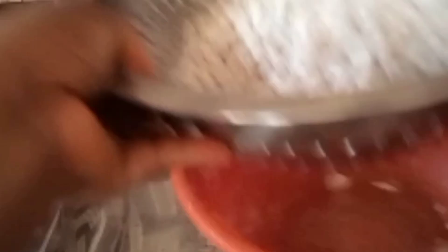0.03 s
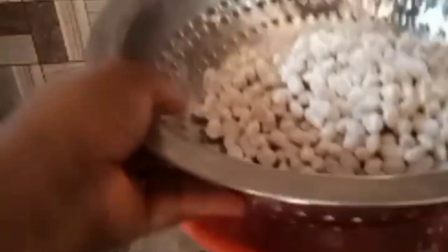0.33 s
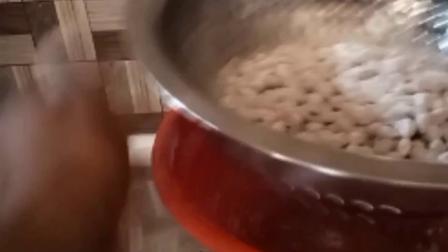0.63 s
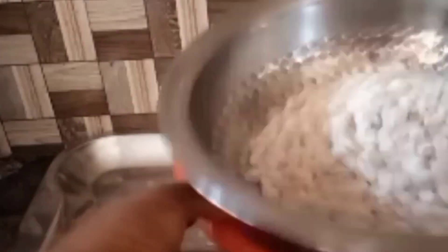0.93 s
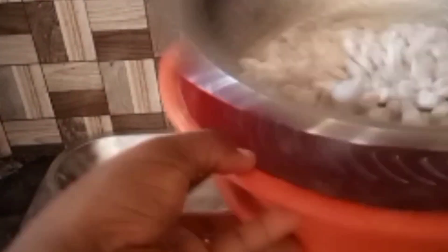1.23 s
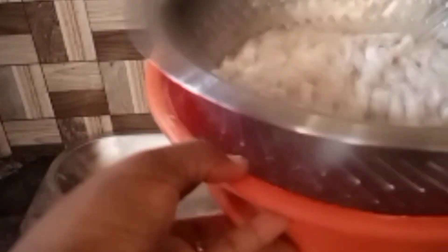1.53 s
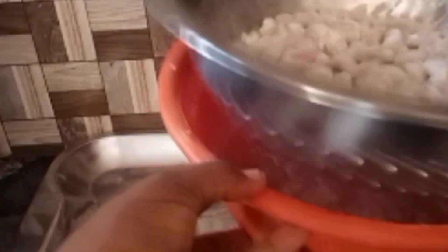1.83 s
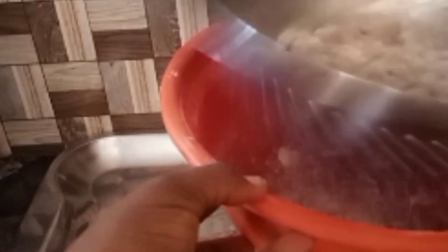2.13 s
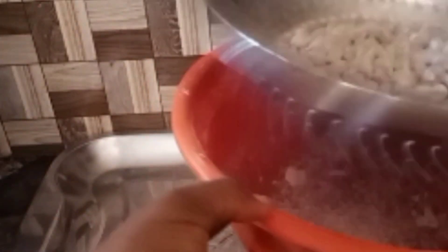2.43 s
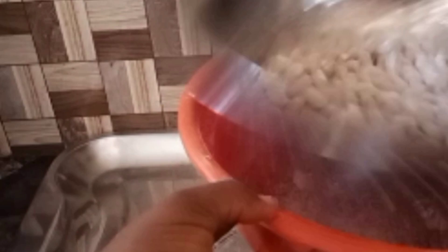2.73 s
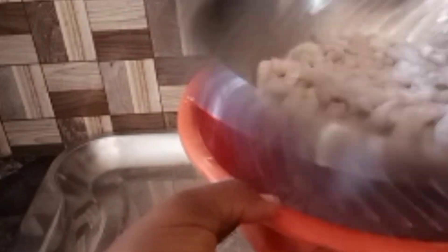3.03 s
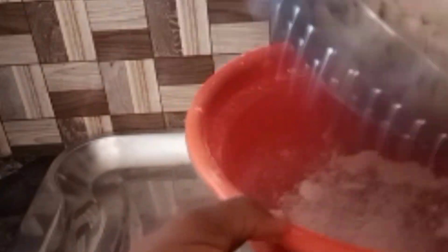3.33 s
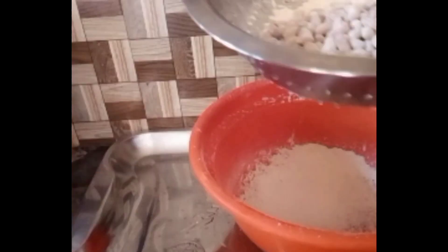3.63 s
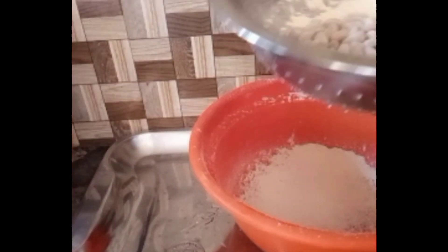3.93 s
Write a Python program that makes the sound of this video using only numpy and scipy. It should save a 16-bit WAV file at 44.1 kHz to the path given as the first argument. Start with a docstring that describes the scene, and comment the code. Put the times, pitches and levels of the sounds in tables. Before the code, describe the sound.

Close up in a kitchen, coated peanuts land in bursts that ring a metal colander. Quieter, fast shaking follows, with nuts sliding and the colander scuffing a plastic bowl. An abrupt, loud rush of nuts ends it and fades.

```python
"""Flour-coated peanuts rattling in a steel colander, close by in a small kitchen. After a dull bump they
are tossed and land in showers of tiny collisions that ring the steel. Then the colander is shaken quickly
over a plastic bowl: the nuts hiss across its holes and clatter on its wall, and it scuffs the bowl.
A last, much louder rush of nuts breaks in abruptly and dies away."""
import sys
import numpy as np
from scipy import signal
from scipy.fft import rfft, irfft, next_fast_len
from scipy.io import wavfile
from scipy.ndimage import uniform_filter1d

SR = 44100
rng = np.random.default_rng(int(sys.argv[2]) if len(sys.argv) > 2 else 0)


def generate_wav(signal):
    """Clip the signal to [-1, 1] and save it as 16-bit WAV at the path in sys.argv[1]."""
    frames = np.transpose(np.atleast_2d(signal))
    scaled = np.clip(frames, -1, 1) * 32767
    pcm = np.round(scaled).astype(np.int16)
    wavfile.write(sys.argv[1], SR, pcm)


N = 176400

# Landing nuts. Each row: start, rise, hold, fall in seconds, then rattle, thud, skitter in relative dB.
SHOWERS = [(0.029, 0.012, 0.058, 0.064, -35.5, -39.5, -50.5),
           (0.375, 0.014, 0.074, 0.042, -30, -64.5, -51.5),
           (0.436, 0.0093, 0.057, 0.038, -31.5, -49.5, -47), (0.646, 0.028, 0.054, 0.038, -37.5, -58, -50),
           (0.709, 0.013, 0.073, 0.032, -30.5, -84, -43), (0.908, 0.022, 0.046, 0.045, -29, -81, -47.5),
           (1.076, 0.01, 0.016, 0.058, -35, -40.5, -38), (1.109, 0.021, 0.1, 0.04, -30, -49, -50),
           (1.276, 0.021, 0.053, 0.16, -28.5, -43, -44), (1.583, 0.018, 0.039, 0.059, -35, -86, -44),
           (1.631, 0.012, 0.028, 0.085, -35, -73, -36)]
# Hard knocks, soft bumps. Each row: start in seconds, relative level in dB, pitch in Hz, T60 in seconds.
CLACKS = [(.38, -33.5, 1990, .14), (.452, -29, 770, 0.031), (.471, -12.5, 1810, 0.04),
          (.49, -29, 2000, .22), (.7194, -20, 5460, 0.031), (.743, -7, 2050, .012),
          (.755, -27.5, 2005, 0.17), (.781, -17, 1790, 0.011), (.79, -33.5, 685.8, 0.23),
          (.912, -24.5, 1940, .067), (.928, -18.5, 1870, 0.027), (1.146, -11, 2100, 0.0099),
          (1.304, -15.5, 756, 0.059), (1.642, -16.5, 5000, 0.026), (1.655, -13, 6300, 0.024)]
BUMPS = [(.024, -6, 311.6, 0.059), (.088, -28, 320, .16), (3.237, -37.5, 190, 0.026),
         (3.345, -48.5, 195, 0.051), (3.544, -16.5, 316, 0.06), (3.926, -43.5, 134, 0.26)]
# Sieving strokes. Each row: peak time, rise, fall in seconds, relative level in dB.
STROKES = [(0, .05, 0.35, -44.5), (1.449, 0.061, 0.064, -44), (1.55, 0.036, 0.1, -49.5),
           (1.764, 0.086, 0.044, -47.5), (1.872, 0.066, 0.12, -38.5), (1.973, 0.055, .13, -47),
           (2.06, 0.034, 0.4, -48), (2.19, .037, .19, -45.5), (2.321, 0.056, .21, -44.5),
           (2.429, 0.059, 0.23, -47.5), (2.545, 0.082, 0.099, -47.5), (2.648, .081, 0.2, -44),
           (2.751, 0.04, 0.084, -40.5), (2.84, 0.066, 0.13, -45.5), (2.938, 0.052, 0.055, -40),
           (3.039, 0.077, 0.12, -39), (3.145, 0.082, 0.12, -40.5), (3.245, 0.082, 0.12, -46.5),
           (3.347, .013, 0.11, -47)]
# Nuts sliding between strokes. Each row: time in seconds, relative level in dB.
SLIDE_LEVELS = [(1.3, -72), (1.4, -52.5), (2, -51.5), (2.5, -57.5), (3.15, -67), (3.3, -65), (3.44, -74)]
# Clumps on the wall, scuffs on the bowl. Each row: time, hold in seconds, relative dB, pitch in Hz.
TUMBLES = [(1.852, 0.035, -44.5, 1370), (2.043, 0.0072, -45.5, 3460), (2.063, 0.026, -42, 1394),
           (2.169, .015, -45.5, 1444), (2.176, 0.027, -47, 2994), (2.291, 0.015, -43, 2580),
           (2.611, 0.022, -44, 1970), (2.718, .008, -49, 2466), (2.797, 0.0064, -39, 1966),
           (2.914, 0.041, -52, 1328), (3.006, 0.038, -44, 1311), (3.124, 0.03, -42.5, 3190),
           (3.212, 0.011, -49.5, 1990)]
RUBS = [(1.718, 0.051, -57, 397), (1.859, .12, -49.5, 452), (2.175, .075, -49.5, 494),
        (2.418, .15, -50.5, 691), (2.765, 0.06, -50.5, 442), (2.949, 0.06, -46.5, 493),
        (2.998, 0.038, -38.5, 498), (3.099, .085, -37.5, 492)]
# Colander modes, hollow ring of the rush. Each row: frequency in Hz, relative level in dB, T60 in seconds.
STEEL_MODES = [(554, -7, 0.13), (690, -5.5, 0.16), (736, -5.5, 0.095), (1017, -9.5, 0.089),
               (1103, -7, 0.11), (1400, -9.5, .15), (1794, -3.5, .19), (1858, -8, 0.23), (1990, 3.5, 0.18),
               (2620, -6, 0.21), (3226, 2, 0.17), (4590, 5, 0.19), (5470, 5, 0.18)]
HOLLOW_MODES = [(383.4, 0.5, 0.17), (506.6, 0, 0.16), (569, -2, .14), (683, -0.5, 0.18), (785, -3, .15),
                (1062, -6, 0.15), (1195, -5.5, .15), (1343, -4, 0.23)]
# Modes of a bump. Each row: pitch ratio, relative level in dB, share of the T60.
BUMP_MODES = [(0.99, 0.5, 0.77), (0.79, -13, 1), (1.604, -12, 0.37), (2.97, -27.5, 0.88), (4.2, -14, 0.47),
              (6.4, -25.5, 0.26), (20.65, -23.5, 0.28)]
# Mode frequencies of the perforated floor.
SIEVE_MODES_HZ = [3600, 3870, 3980, 5120, 5640, 5820, 5960, 6830]
# Spectral shapes of the noisy layers. Each row: frequency in Hz, relative level in dB.
RATTLE_SPECTRUM = [(100, -47), (170, -25.5), (270, -8.5), (460, -5.5), (740, -3), (940, -3.5), (1150, 0.5),
                   (1550, -7.5), (1980, -13.5), (2400, -13), (3150, -14.5), (3600, -21.5), (5500, -33.5),
                   (9000, -33), (12000, -58)]
THUD_SPECTRUM = [(30, -30), (70, -15), (125, -1), (200, 0.5), (320, -5.5), (700, -39.5)]
SKITTER_SPECTRUM = [(1500, -38), (3300, -4.5), (4800, 5.5), (6300, 5), (8000, -1), (10000, -16.5),
                    (13000, -37), (15300, -22)]
HISS_SPECTRUM = [(500, -20.5), (1300, -10), (2600, -21), (3800, -15), (4600, -8.5), (6000, -0.5),
                 (8500, -6), (10200, -20), (12500, -29.5), (15300, -20.5)]
TUMBLE_SPECTRUM = [(300, -17), (800, 0.5), (1400, 9.5), (2100, -9.5), (3200, 3), (4300, -6), (7000, -39)]
RUSH_SPECTRUM = [(29, -75), (50, -51), (108, -15), (147, -16), (190, -8), (270, -13), (385, -8.5),
                 (760, -5), (1600, -9), (5790, -19), (15500, -48)]
SPRAY_SPECTRUM = [(1000, -5), (2500, -3), (4000, -1.5), (7000, 1), (10000, -11.5), (13000, -23.5),
                  (15300, -13.5)]
BACKGROUND_SPECTRUM = [(30, -23), (140, -1), (450, 7), (1200, -3), (2600, -11.5), (6000, -2.5),
                       (9400, -12.5), (12500, -28), (15400, -16)]

TIME_S = np.arange(N) / SR


def showers(loaded_t60_share=0.2):
    """Tossed nuts rain on the steel: a rattle that rings it, clinks, the heap's thud, bright skitter."""
    shapes = np.array([swell(*row[:4]) for row in SHOWERS])
    rattle_env, thud_env, skitter_env = amp(np.array(SHOWERS)[:, 4:]).T @ shapes
    rattle = colour(rattle_env * contacts(900, 3.5, 0.009), RATTLE_SPECTRUM)
    clinks = amp(-8) * pings(rattle_env, 240, 520.3, 2310, 0.025)
    clinks += amp(-4) * pings(skitter_env, 200, 2840, 6800, 0.081)
    loaded_modes = [(hz, db, t60_s * loaded_t60_share) for hz, db, t60_s in STEEL_MODES]  # heap damps them
    steel = amp(-9) * ring(rattle, loaded_modes) + amp(-13.5) * ring(rattle, STEEL_MODES)
    thud = colour(thud_env * contacts(500, 3.9, 0.0093), THUD_SPECTRUM)
    skitter = colour(skitter_env * contacts(1300, 2.3, 0.008), SKITTER_SPECTRUM)
    return amp(-7) * rattle + steel + clinks + thud + amp(-1) * skitter


def rush():
    """A click, the first nuts, then the whole heap; its wide, bright spray dies sooner than its body."""
    click_env = amp(-27) * swell(3.4975, 0.00079, 0.0011, 0.00076)
    body_env = click_env + amp(-25) * swell(3.506, 0.0031, 0.033, 0.017)
    body_env += amp(-21) * swell(3.5516, 0.02, 0.13, 0.15)
    spray_env = click_env / 2 + amp(-34) * swell(3.506, 0.0021, 0.03, 0.039)
    spray_env += amp(-21.5) * swell(3.552, 0.0041, 0.046, 0.13)
    heap = colour(body_env * contacts(2200, 2.76, 0.008), RUSH_SPECTRUM)
    mid, side = (colour(spray_env * contacts(3500, 4, 0.005), SPRAY_SPECTRUM) for _ in range(2))
    side = butterworth(side, 3, 7500, 'high')
    ringing = amp(-22) * ring(heap, STEEL_MODES) + amp(-14) * ring(heap, HOLLOW_MODES)
    return amp(-2) * heap + ringing + mid + amp(-7) * np.array([side, -side])


def sieving():
    """Each stroke slides the nuts over the ringing holes; single nuts tinkle."""
    shapes = np.array([swell(peak_s - rise_s, rise_s, 0, fall_s) for peak_s, rise_s, fall_s, _ in STROKES])
    stroke_env = amp(np.array(STROKES)[:, 3]) @ shapes
    slide_env = amp(np.interp(TIME_S, *np.transpose(SLIDE_LEVELS)))
    env = np.hypot(stroke_env, slide_env)
    tinkle = amp(-6.5) * pings(env, 230, 3000, 7000, 0.081) + amp(-8) * pings(env, 160, 500.3, 3300, 0.09)
    hiss = colour(env * contacts(3500, 3.2, 0.0088), HISS_SPECTRUM)
    holes = ring(hiss, [(hz, 0, 0.1) for hz in SIEVE_MODES_HZ])
    return amp(-3.5) * hiss + amp(-14) * holes + tinkle


def clacks():
    """One nut strikes hard: a crack, a short local ring, and the whole colander answers."""
    hits, t = np.zeros(N), TIME_S[:SR // 5]
    for start_s, db, hz, t60_s in CLACKS:
        crack = amp(-11) * decay(t, t60_s=0.026) * rng.standard_normal(len(t))
        tone = decay(t, t60_s) * np.sin(2 * np.pi * hz * t)
        hits[int(start_s * SR):][:len(t)] += amp(db - 5.5) * (tone + crack)
    hits = butterworth(hits, 4, [400, 6800], 'band')
    return hits + amp(-16.5) * ring(hits, STEEL_MODES)


def tumbles():
    """A clump of nuts clatters against the wall and rings the patch it meets."""
    hits = contacts(600, 3.5, 0.011)
    clatter, clinks = np.zeros((2, N))
    for at_s, hold_s, db, hz in TUMBLES:
        clump = amp(db) * swell(at_s - 0.002, 0.0035, hold_s, 0.055) * hits
        clatter += clump
        clinks += patch(clump, hz, spread=0.0535, t60_s=0.049)
    return amp(-1) * clinks + amp(-6.5) * colour(clatter, TUMBLE_SPECTRUM)


def bumps():
    """Dull, hand-damped knocks of colander and bowl."""
    out, t = np.zeros(N + SR), TIME_S[:SR // 3]
    for start_s, db, hz, t60_s in BUMPS:
        knock = sum(amp(db + mode_db) * decay(t, t60_s * share) * np.sin(2 * np.pi * hz * ratio * t)
                    for ratio, mode_db, share in BUMP_MODES)
        out[int(start_s * SR):][:len(t)] += butterworth(knock, 3, 0.94 * hz, 'high')
    return out[:N]


def squeak(start_s=1.823, rise_s=0.012, pitch_hz=3074, waver=0.0079, ring_hz=3137):
    """The rim catches and sings briefly, then rings on."""
    drift = unit(uniform_filter1d(rng.standard_normal(N), size=60))
    phase = 2 * np.pi * np.cumsum(pitch_hz * (1 + waver * drift)) / SR
    tone = swell(start_s, rise_s, hold_s=0.011, fall_s=0.045) * unit(np.sin(phase))
    t = TIME_S - start_s
    tail = np.clip(t / rise_s, 0, 1) * decay(t, t60_s=0.44) * np.sin(2 * np.pi * ring_hz * t)
    return amp(-29) * tone + amp(-35) * tail


def rubs():
    """The colander scuffs the plastic bowl, whose hollow pitch shifts with the place of contact."""
    slips, bowl = contacts(230, 2.4, 0.03), np.zeros(N)
    for at_s, hold_s, db, hz in RUBS:
        scuff = amp(db) * swell(at_s - 0.01, 0.023, hold_s, 0.059) * slips
        bowl += patch(scuff, hz, spread=0.19, t60_s=0.061)
    return butterworth(bowl, 2, [260, 1000], 'band')


def kitchen_reverb(x, delay_s=0.004, t60_s=0.16):
    """Close tiled walls return a short diffuse tail."""
    t = TIME_S[:SR // 2]
    return convolve(x, decay(t - delay_s, t60_s) * rng.standard_normal(len(t)))


def background():
    """Steady noise floor."""
    return colour(rng.standard_normal(N), BACKGROUND_SPECTRUM)


def contacts(per_s, spread_db, t60_s):
    """Tiny collisions, each a noise burst of its own size; rms 1."""
    count, t = int(per_s * N / SR), TIME_S[:int(t60_s * SR) + 2]
    onsets = ((np.arange(count) + 2 * rng.random(count)) * SR / per_s).astype(int)
    sizes = amp(spread_db * np.clip(rng.standard_normal((count, 1)), -2, 2))
    grains = sizes * decay(t, t60_s) * rng.standard_normal((count, len(t)))
    samples = onsets[:, None] + np.arange(len(t))
    return unit(np.bincount(samples.ravel(), grains.ravel(), N)[:N])


def pings(env, per_s, low_hz, high_hz, t60_s):
    """Single nuts ring small patches of wall, each at its own pitch; the level follows env."""
    count, t = int(per_s * N / SR), TIME_S[:int(t60_s * SR)]
    jitter, pitch, size, life = rng.random((4, count, 1))
    onsets = ((np.arange(count)[:, None] + jitter) * (N - 1) / count).astype(int)
    hz = low_hz * (high_hz / low_hz) ** pitch
    attack = 1 - np.exp(-2 * hz * t)
    grains = amp(10 * size) * attack * decay(t, t60_s * (0.5 + life)) * np.sin(2 * np.pi * hz * t)
    grains *= env[onsets] * np.sqrt(N / np.sum(grains ** 2))
    samples = onsets + np.arange(len(t))
    return np.bincount(samples.ravel(), grains.ravel(), N)[:N]


def patch(x, hz, spread, t60_s):
    """Drive one patch of wall: three close modes around hz."""
    return ring(x, [(hz * (1 + spread) ** k, 0, t60_s) for k in (-1, 0, 1)])


def ring(x, modes):
    """Drive damped modes of random phase."""
    t = TIME_S[:SR // 2]
    response = sum(amp(db) * decay(t, t60_s) * np.sin(2 * np.pi * (hz * t + rng.random()))
                   for hz, db, t60_s in modes)
    return convolve(x, response)


def swell(start_s, rise_s, hold_s, fall_s, rise_db=23.5, sag_db_per_s=33, fall_db=30):
    """Envelope: attack, sagging hold, release of fall_db per fall_s."""
    t = TIME_S - start_s
    attack_db = rise_db * np.minimum(t / rise_s - 1, 0)
    sag_db = sag_db_per_s * np.clip(t - rise_s, 0, hold_s)
    release_db = fall_db * np.maximum(t - rise_s - hold_s, 0) / fall_s
    return amp(np.maximum(attack_db - sag_db - release_db, -200))


def decay(t, t60_s):
    """Exponential fade from t = 0, silent before."""
    return (t >= 0) * np.exp(-np.log(1000) * np.abs(t) / t60_s)


def colour(x, spectrum, size=4096):
    """Minimum-phase filter of unit power, shaped like spectrum."""
    hz, db = np.transpose(spectrum)
    shape_db = np.interp(np.log(np.fft.rfftfreq(size, 1 / SR) + 1), np.log(hz), db)
    cepstrum = irfft(np.log(amp(shape_db)))
    cepstrum[1:size // 2] *= 2
    cepstrum[size // 2 + 1:] = 0
    return convolve(x, irfft(np.exp(rfft(cepstrum))))


def convolve(x, response):
    """Apply an impulse response scaled to energy 1."""
    return signal.fftconvolve(x, response / np.linalg.norm(response))[:N]


def butterworth(x, order, hz, kind):
    """Causal filter with a flat passband."""
    return signal.sosfilt(signal.butter(order, hz, kind, fs=SR, output='sos'), x)


def amp(db):
    """Decibels to gain."""
    return 10 ** (np.asarray(db) / 20)


def unit(x):
    """Scale to rms 1."""
    return x / np.sqrt(np.mean(x ** 2) + 1e-20)


def scene():
    """Nuts, colander and bowl in the kitchen over a faint background; stereo."""
    direct = showers() + clacks() + bumps() + sieving() + tumbles() + rubs() + squeak() + rush()
    return direct + amp(-17) * kitchen_reverb(direct.mean(axis=0)) + amp(-64.5) * background()


def record(dry, low_cut_hz=37, top_hz=15700):
    """The small microphone loses the deep bass; nothing passes above top_hz."""
    dry = butterworth(dry, 2, low_cut_hz, 'high')
    size = next_fast_len(N + SR // 2)
    passband = np.fft.rfftfreq(size, 1 / SR) < top_hz
    return irfft(rfft(dry, size) * passband, size)[:, :N]


dry = scene()
out = record(dry)
generate_wav(out)
```